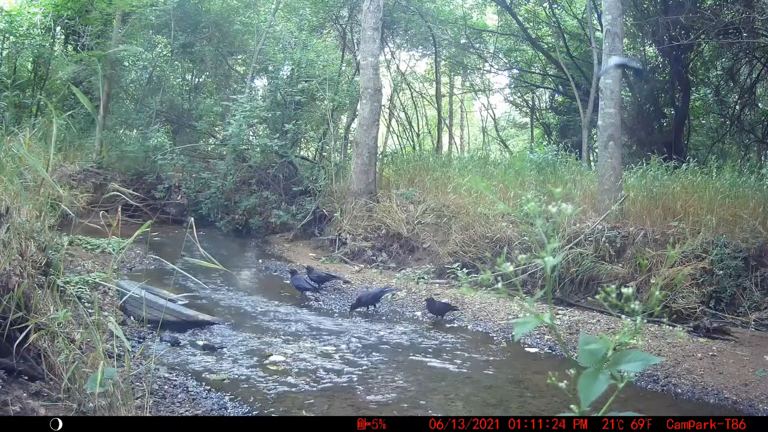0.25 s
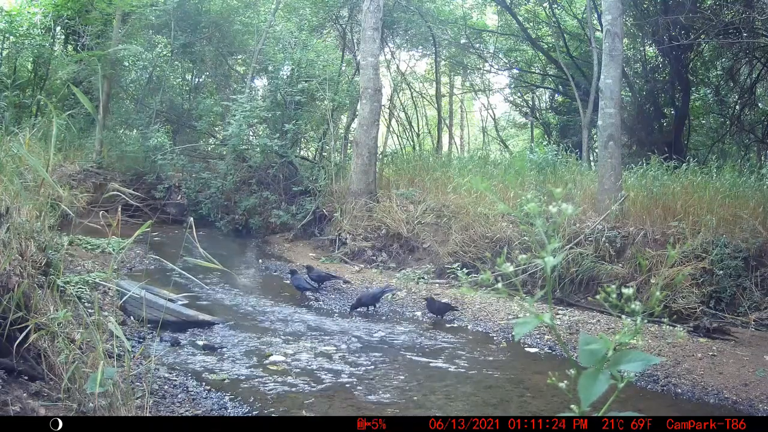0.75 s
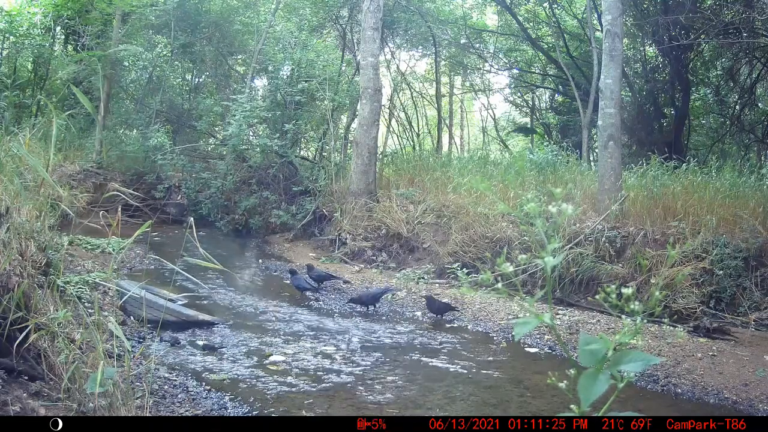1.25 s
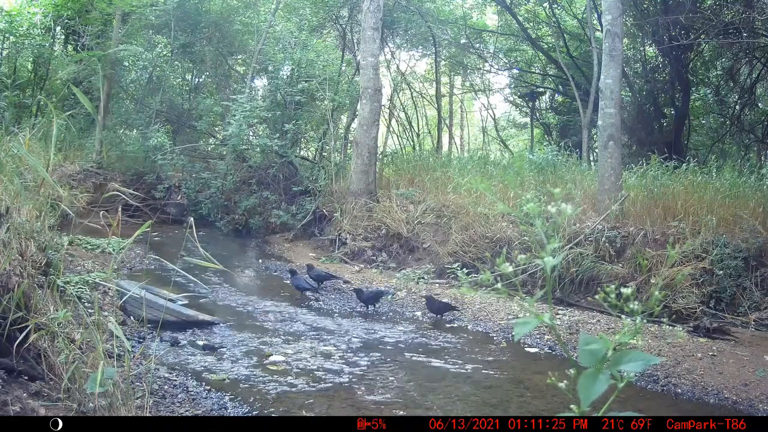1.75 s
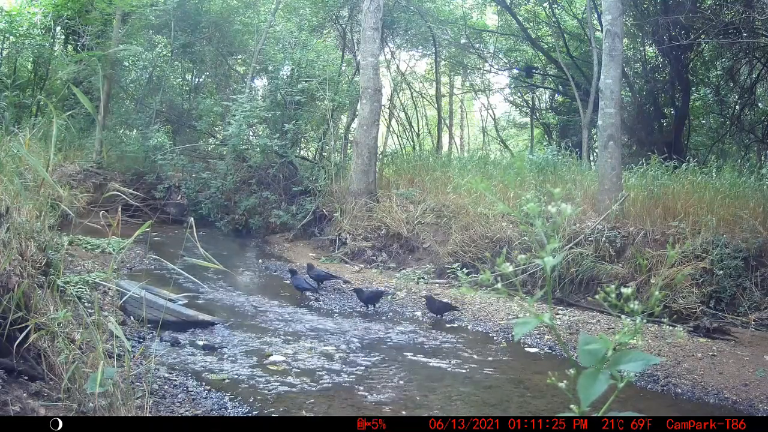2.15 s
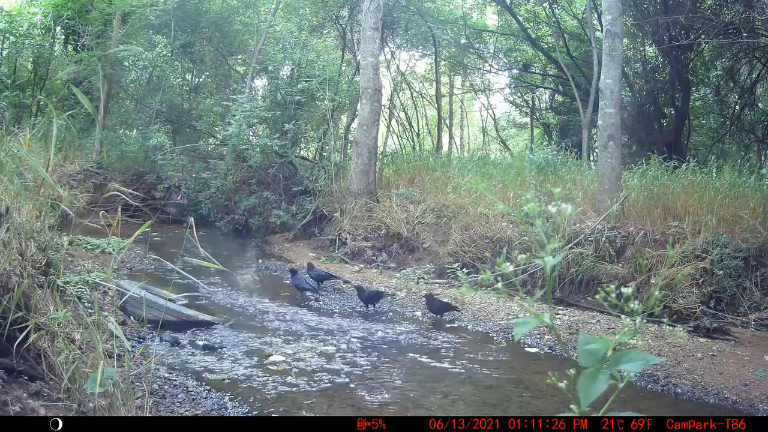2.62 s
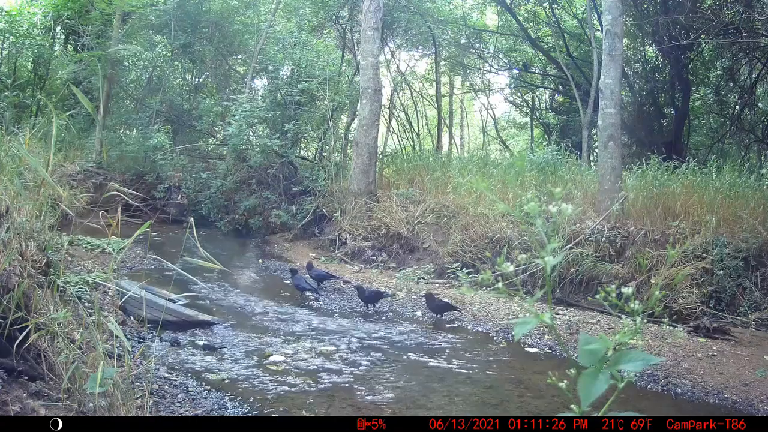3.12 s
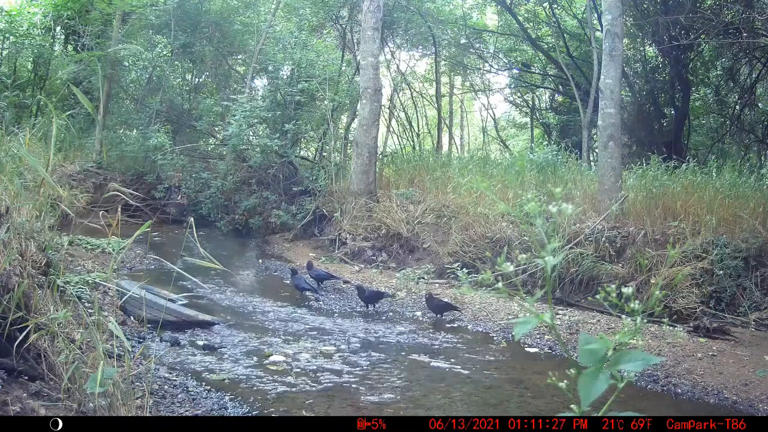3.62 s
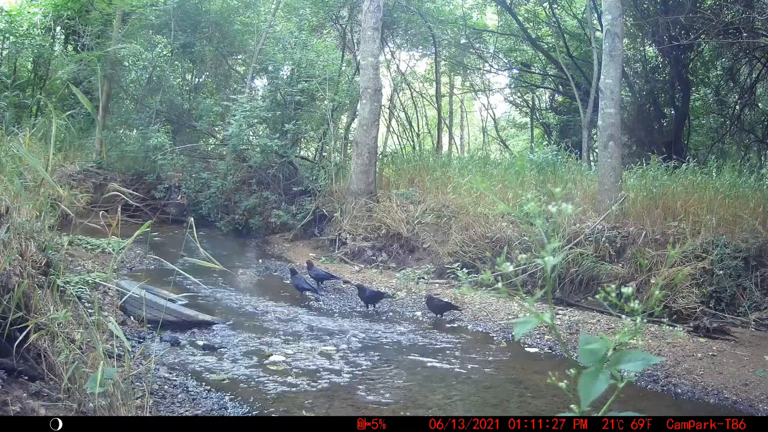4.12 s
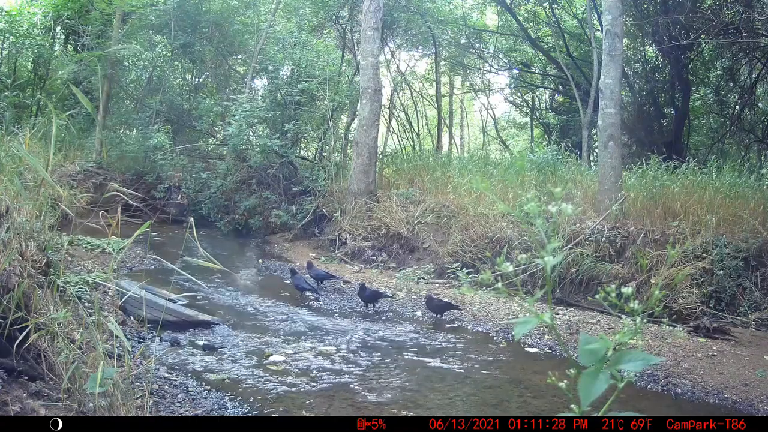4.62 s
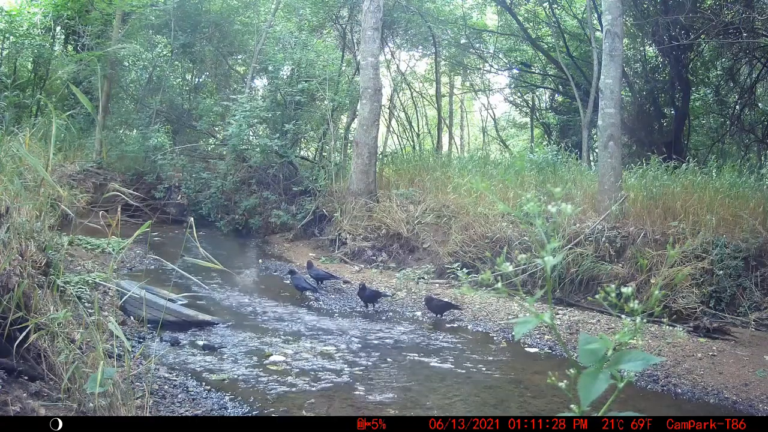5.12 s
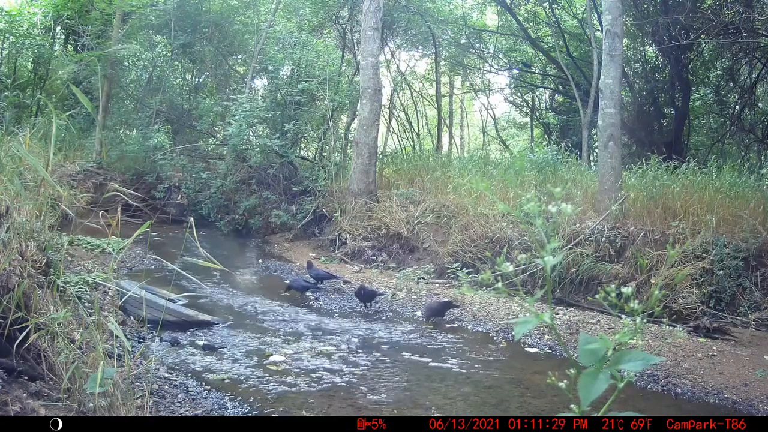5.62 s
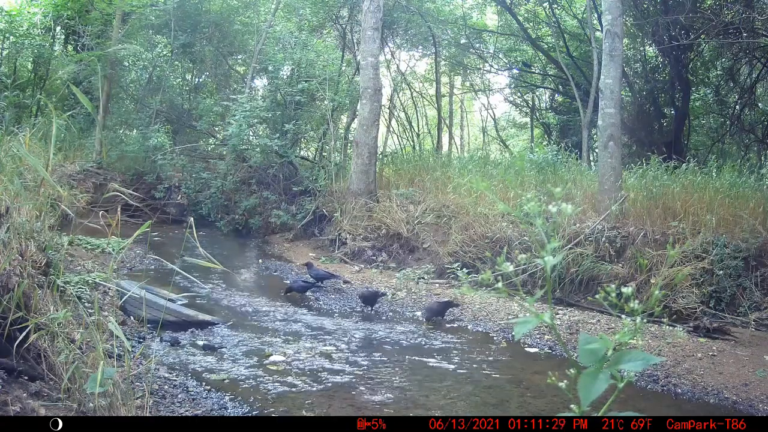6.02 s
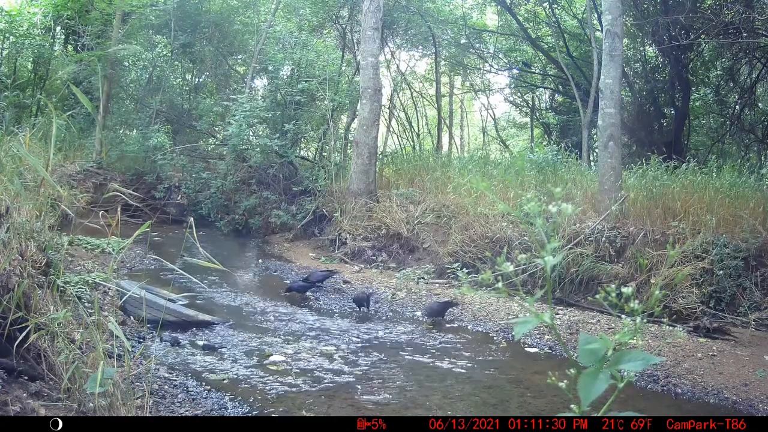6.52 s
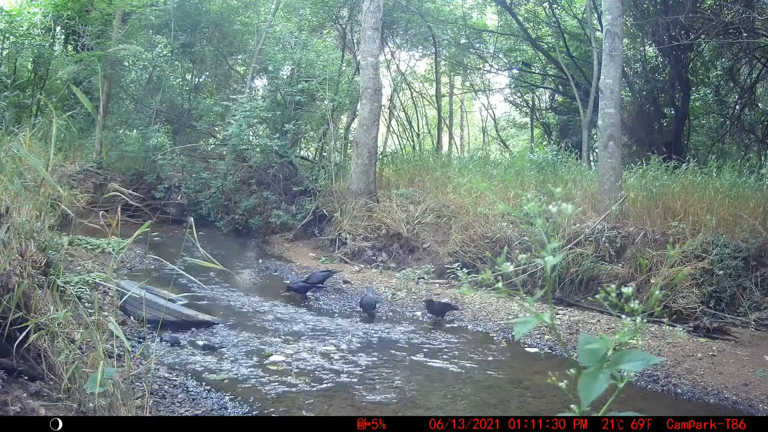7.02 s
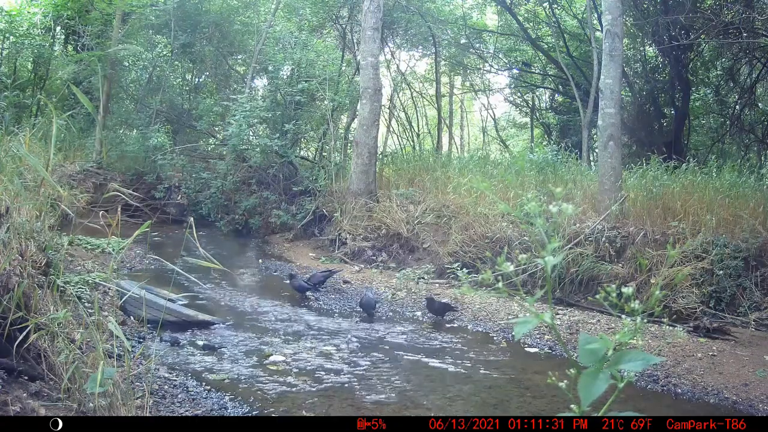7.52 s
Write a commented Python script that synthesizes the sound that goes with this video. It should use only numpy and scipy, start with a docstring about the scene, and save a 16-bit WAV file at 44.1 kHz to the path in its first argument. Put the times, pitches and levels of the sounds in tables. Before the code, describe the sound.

From 0 to 2.7 s the scene is quiet: a steady, dull rumble of distant traffic, a very faint hiss of creek water, slight leaf rustling in the first half second, and small high drips near 0.15, 0.4, 1.0, 1.5 and 2.5 s. A tiny pebble tick comes at 2.6 s. At 2.73 s a crow begins cawing, far louder than everything else: nine harsh, nasal caws of about 0.13-0.16 s at roughly 2.7, 3.1, 3.5, 3.8, 4.1, 4.4, 4.8, 5.2 and 5.7 s. Each arches quickly up and down in pitch, raspy at its edges, with a short scattered echo from the trees. The later caws are slightly lower and wider spaced. A low engine drone enters around 4.4 s, swelling near 5.8 s. From 6 to 7.75 s only rumble, drone, faint water, a few dry beak clicks and drips remain, including a lower plop near 7.6 s.

```python
"""Crow calling at a woodland creek

A crow on the gravel gives nine short caws: pulses and turbulence filtered by throat resonances.
Trunks and banks scatter each caw into a tail of decaying noise. Shaped noise makes the creek's wash and
the far traffic's rumble; a gliding sine makes a low engine drone that swells late on.
Ringing bubbles drip, leaves rustle in puffs of noise and a beak ticks on pebbles as resonant clicks."""
import sys
import numpy as np
from scipy import signal
from scipy.fft import rfft, irfft, next_fast_len
from scipy.io import wavfile
from scipy.ndimage import uniform_filter1d

SR = 44100
rng = np.random.default_rng(int(sys.argv[2]) if len(sys.argv) > 2 else 0)


def int16_out(signal):
    """Quantize to a 16-bit WAV file."""
    q = np.round(np.clip(np.atleast_2d(signal).T, -1, 1) * 32767)
    wavfile.write(sys.argv[1], SR, q.astype(np.int16))


N = 341907

# Traffic rumble. Each row: time in seconds, level in dB.
RUMBLE_LEVEL = [(0, -48), (2.6, -50.5), (3.4, -45.5), (5.9, -46.5), (6.5, -48), (7.75, -48)]
# Rumble spectrum. Each row: frequency in Hz, relative density in dB per Hz.
RUMBLE_SPECTRUM = [(11, -39.5), (18, -9), (55, 1.5), (133, -4.5), (189, -3), (348, -10.5), (485, -15.5),
                   (770, -18.5), (893, -17), (1290, -22), (1500, -25), (1950, -33.5), (3300, -120)]
# Creek hiss. Each row: time in seconds, level in dB.
CREEK_LEVEL = [(0, -62.5), (.6, -65), (7.75, -64.5)]
# Creek spectrum. Each row: frequency in Hz, relative density in dB per Hz.
CREEK_SPECTRUM = [(880, -31.5), (1500, 0), (2390, -2.5), (2750, -4), (3560, -6.5), (7390, -7.5),
                  (14500, -17)]
# Leaf rustles. Each row: centre in seconds, rms level at the centre in dB, 1/e half-length in seconds.
LEAF_RUSTLES = [(0.07, -62.5, 0.048), (0.245, -63.5, 0.076), (0.424, -65.5, 0.042)]
# Drips. Each row: start in seconds, level before onset and decay in dB, starting pitch in Hz.
DRIP_BUBBLES = [(0.1491, -52, 2210), (0.378, -54, 2900), (0.987, -52, 2510), (1.465, -46.5, 2587),
                (2.534, -50, 2384), (4.3693, -47, 2570), (6.0225, -53.5, 2697), (6.3929, -55.5, 3600),
                (6.778, -50.5, 2364), (7.0167, -55.5, 3600), (7.637, -45.5, 1368)]
# Beak ticks on pebbles. Each row: time in seconds, nominal peak in dB.
PEBBLE_TICKS = [(2.6091, -49), (6.1747, -43.5), (6.3531, -46), (6.4944, -45.5), (6.7035, -50)]
# Caws. Each row: start in seconds, length in seconds, time from start to top pitch in seconds,
# top pitch in Hz, level at peak effort in dB.
CAW_ROWS = [(2.733, .16, 0.0681, 654.8, -26.5), (3.127, 0.1462, 0.0622, 686, -26.5),
            (3.457, 0.1329, 0.0556, 690, -27.5), (3.782, 0.1346, 0.04954, 690.8, -28),
            (4.085, 0.1355, 0.0523, 692.1, -26.5), (4.446, 0.1302, 0.0527, 653.9, -26.5),
            (4.784, 0.1331, .052, 654.3, -27.5), (5.18, 0.1292, 0.0492, 639.2, -28.5),
            (5.681, 0.1293, 0.05465, 625.6, -27.5)]
# Windpipe and beak resonances. Each row: centre in Hz, width in Hz before widening, relative level in dB.
THROAT_MODES = [(1415, 364.3, -0.5), (1573, 608, -4), (2488.6, 614, -15), (3567, 1455, -14), (5296, 686, 1),
                (5829, 456, -1), (8400, 1248, -12.5), (10297, 2330, -20.5)]
# Weak low chest resonances. Each row: centre in Hz, width in Hz before widening, relative level in dB.
CHEST_MODES = [(743, 442, -20), (855.4, 241, -11.5)]
# Scatter of the wood. Each row: frequency in Hz, 60 dB decay in seconds before the reach limit,
# relative level in dB.
WOOD_DECAY = [(960, 0.887, 2), (1537, 0.379, -8), (3320, 0.609, -1), (6160, 0.3477, -1), (11370, 0.555, 1)]
# Engine drone. Each row: time in seconds, pitch in Hz, level in dB.
ENGINE_DRONE = [(4.4, 61, -52), (5.7, 65, -50), (5.85, 65.2, -46), (7.0, 67.9, -51.5), (7.75, 69.4, -49)]

RUMBLE_FLUTTER_DB, CREEK_FLUTTER_DB = .5, .4   # rms
WASH_SIDE_DB = -44.5   # side gain of rumble and creek
TICK_HZ, TICK_WIDTH_HZ = 5650, 1360   # width of each of two passes
# pitch arch: fall in s; shares of the top pitch missing at the start and after a full fall; roundness
FALL_S, ARCH_RISE, ARCH_SAG, ARCH_BEND = .075, .27, .34, 1.6
# effort: share of the length to its peak; dB under the peak at the start and at the end
EFFORT_TOP, SWELL_DB, FADE_DB = 0.5, 11.5, 2.5
ATTACK_S, RELEASE_S = .028, 0.02746
# rms share of the pitch; rms flutter in dB per order up to the fifth; loss in dB per order over the third
JITTER, SHIMMER_DB, ORDER_FALL_DB = .022, 1.5, 4.2
# turbulence in dB; its rise in dB per unit share of pitch sag; treble lean 0-1
RASP_DB, SLACK_DB, RASP_TILT = 2.5, 30, .45
BRIGHTENING = .35   # dB on the upper resonances per dB of effort
MODE_WIDENING = 1.615   # factor on the throat and chest widths
BEAK_CUT_HZ, BEAK_TOP_HZ = 1438.7, 10266   # the beak radiates little outside these
# a windpipe resonance climbs through each caw; the width is that of each of two passes
GLIDE_FROM_HZ, GLIDE_TO_HZ, GLIDE_WIDTH_HZ, GLIDE_DB = 3287, 3850, 529, -1.5
WOOD_DB, WOOD_SIDE_DB, DIRECT_DB = 0, -32, 0.5   # tail gain, its extra side gain, direct caw gain
WOOD_ONSET_S, WOOD_REACH_S = 0.00668, 0.2507   # build-up; the far trees return ever less
CUTOFF_HZ = 15800


def from_db(db):
    """The decibel law: 20 dB is a tenfold amplitude gain."""
    return 10 ** (np.asarray(db) / 20)


def rms_one(x):
    """Energy normalisation: scale to unit rms."""
    return x / np.sqrt(np.mean(x ** 2) + 1e-20)


def in_time(rows, t):
    """Linear interpolation: the columns of a curve table read at times t."""
    s, *columns = np.transpose(rows)
    return [np.interp(t, s, c) for c in columns]


def at_hz(points, hz):
    """Logarithmic frequency: a spectrum table interpolated on a log axis."""
    points = np.array(points)
    return np.interp(np.log(hz + 1), np.log(points[:, 0]), points[:, 1])


def drift(size, rate_hz):
    """Low-passed noise: a double pole leaves slow chance of unit rms."""
    r = np.exp(-2 * np.pi * rate_hz / SR)
    settle = 9000   # samples dropped while the filter settles
    slow = signal.lfilter([1], [1, -2 * r, r * r], rng.standard_normal(size + settle))
    return rms_one(slow[settle:])


def coloured(spectrum):
    """Spectral shaping: two independent noises (mid, side) weighted by frequency; joint rms 1."""
    size = next_fast_len(N)
    gain = from_db(at_hz(spectrum, np.arange(size // 2 + 1) * SR / size))
    white = rng.standard_normal((2, size))
    return rms_one(irfft(rfft(white) * gain, size)[:, :N])


def peak_filter(hz, width):
    """Damped resonator: numerator and denominator of a two-pole peak of gain 1."""
    r = np.exp(-np.pi * width / SR)
    return [(1 - r * r) / 2, 0, (r * r - 1) / 2], [1, -2 * r * np.cos(2 * np.pi * hz / SR), r * r]


def resonance(x, hz, width):
    """Resonance: a signal passed through one fixed damped resonator."""
    return signal.lfilter(*peak_filter(hz, width), x)


def rumble(t):
    """Broadband noise: far traffic as low noise whose level wanders slowly; mid and side."""
    level_db = in_time(RUMBLE_LEVEL, t)[0] + RUMBLE_FLUTTER_DB * drift(N, 0.9)
    return coloured(RUMBLE_SPECTRUM) * from_db(level_db) * from_db([[0], [WASH_SIDE_DB]])


def creek(t):
    """Broadband noise: the wash of water as fluttering hiss; mid and side."""
    level_db = in_time(CREEK_LEVEL, t)[0] + CREEK_FLUTTER_DB * drift(N, 12)
    return coloured(CREEK_SPECTRUM) * from_db(level_db) * from_db([[0], [WASH_SIDE_DB]])


def rustles(t):
    """Friction noise: leaves as soft Gaussian puffs of grainy treble noise."""
    puffs = sum(from_db(db) * np.exp(-((t - s) / length) ** 2) for s, db, length in LEAF_RUSTLES)
    band = signal.butter(1, [2000, 10000], "band", fs=SR, output="sos")
    noise = rms_one(signal.sosfilt(band, rng.standard_normal(N)))
    grain = from_db(2.6 * drift(N, 60))
    return puffs * noise * grain


def drips():
    """Bubble resonance: each drip rings for some tens of cycles, rising a little in pitch."""
    out, t = np.zeros(N), np.arange(2000) / SR
    for s, peak_db, hz in DRIP_BUBBLES:
        cycles = hz * t
        ring = np.sin(2 * np.pi * cycles * (1 + 4.5 * t))
        decay = from_db(peak_db - 1.035 * cycles)   # a fixed loss per cycle
        onset = np.minimum(cycles / 1.3, 1)
        start = round(s * SR)
        out[start:start + len(t)] += ring * decay * onset
    return out


def ticks():
    """Impulse response: single clicks through a wide, bright resonance, passed twice."""
    clicks = np.full(N, 1e-18)   # a tiny floor in place of exact zeros
    for s, peak_db in PEBBLE_TICKS:
        clicks[round(s * SR)] = from_db(peak_db) * SR / (np.pi * TICK_WIDTH_HZ)
    return resonance(resonance(clicks, TICK_HZ, TICK_WIDTH_HZ), TICK_HZ, TICK_WIDTH_HZ)


def crow():
    """Superposition: all caws added on one dry track."""
    out = np.zeros(N)
    for row in CAW_ROWS:
        start, sound = caw(*row)
        out[start:start + len(sound)] += sound
    return out


def caw(start, length, top_s, top_hz, peak_db):
    """Source and filter: unsteady syrinx pulses and turbulence excite the throat."""
    t = np.arange(0, length, 1 / SR)
    up = np.clip(1 - t / top_s, 0, 1)
    down = np.clip((t - top_s) / FALL_S, 0, 1)
    pitch = top_hz * (1 - ARCH_RISE * up ** ARCH_BEND - ARCH_SAG * down ** ARCH_BEND)
    effort_db = np.interp(t / length, [0, EFFORT_TOP, 1], [-SWELL_DB, 0, -FADE_DB])
    phase = 2 * np.pi * np.cumsum(pitch * (1 + JITTER * drift(len(t), 154))) / SR
    slack = 1 - pitch / top_hz   # slack membranes leak more air: hoarse start and end
    rasp_gain = from_db(RASP_DB + SLACK_DB * slack)
    source = rms_one(syrinx_pulses(phase)) + rasp_gain * rms_one(turbulence(phase))
    voice = throat(source, from_db(BRIGHTENING * effort_db))
    voice /= np.sqrt(uniform_filter1d(voice ** 2, size=900) + 1e-9)   # effort alone sets the loudness
    edges = np.clip(t / ATTACK_S, 0, 1) * np.clip((length - t) / RELEASE_S, 0, 1)
    return round(start * SR), voice * from_db(peak_db + effort_db) * edges


def syrinx_pulses(phase):
    """Harmonic series: eleven orders, each with its own flutter, make broken overtones."""
    pulses = np.zeros(len(phase))
    for k in range(1, 12):
        shimmer_db = SHIMMER_DB * min(k, 5) * drift(len(phase), 90)
        pulses += np.cos(k * phase) * from_db(shimmer_db - ORDER_FALL_DB * max(k - 3, 0))
    return pulses


def turbulence(phase):
    """Modulated jet noise: treble-leaning breath that bursts once a cycle."""
    noise = signal.lfilter([1, -RASP_TILT], [1], rng.standard_normal(len(phase)))
    return noise * (1 + 0.75 * np.cos(phase))


def throat(x, bright):
    """Parallel resonators: chest, windpipe and beak; those over the second open with effort."""
    first, second, *upper = modes(x, THROAT_MODES)
    upper.append(from_db(GLIDE_DB) * gliding(gliding(x)))
    beak_band = signal.butter(5, [BEAK_CUT_HZ, BEAK_TOP_HZ], "band", fs=SR, output="sos")
    beak = signal.sosfilt(beak_band, first + second + bright * sum(upper))
    return beak + sum(modes(x, CHEST_MODES))


def modes(x, table):
    """Cascaded resonance: each mode is applied twice so the valleys stay dark."""
    out = []
    for hz, width, db in table:
        wide = MODE_WIDENING * width
        out.append(from_db(db) * resonance(resonance(x, hz, wide), hz, wide))
    return out


def gliding(x, size=128):
    """Time-varying resonance: a peak of gain 1 whose centre climbs block by block."""
    state, out = np.zeros(2), []
    for i in range(0, len(x), size):
        hz = GLIDE_FROM_HZ + (GLIDE_TO_HZ - GLIDE_FROM_HZ) * i / len(x)
        block, state = signal.lfilter(*peak_filter(hz, GLIDE_WIDTH_HZ), x[i:i + size], zi=state)
        out.append(block)
    return np.concatenate(out)


def wood(x):
    """Diffuse scattering: trunks and banks return noise that builds briefly and dies band by band."""
    # lows pass round trunks
    x = signal.sosfilt(signal.butter(6, 820, "high", fs=SR, output="sos"), x)
    t = np.arange(SR) / SR
    table = np.array(WOOD_DECAY)
    tail = np.zeros((2, SR))   # mid and side
    edges = 300 * 2 ** np.arange(0, 6, .75)   # Hz
    for low, high in zip(edges, edges[1:]):
        band_filter = signal.butter(2, [low, high], "band", fs=SR, output="sos")
        band = signal.sosfilt(band_filter, rng.standard_normal((2, SR)))
        centre = np.sqrt(low * high)
        t60 = at_hz(table[:, [0, 1]], centre)
        level_db = at_hz(table[:, [0, 2]], centre)
        tail += band * from_db(level_db - 60 * t / t60)
    tail *= (1 - np.exp(-t / WOOD_ONSET_S)) * np.exp(-(t / WOOD_REACH_S) ** 2)
    tail /= np.sqrt(np.sum(tail[0] ** 2))   # unit energy in the mid
    tail[1] = signal.lfilter([1, -.7], [1], tail[1])   # first difference: the side leans to the treble
    scattered = signal.fftconvolve(x[None], tail, axes=1)[:, :N]
    return scattered * from_db([[WOOD_DB], [WOOD_DB + WOOD_SIDE_DB]])


def drone(t):
    """Phase accumulation: the engine as one sine of gliding pitch and wavering level."""
    hz, level_db = in_time(ENGINE_DRONE, t)
    swell = np.clip((t - ENGINE_DRONE[0][0]) / .5, 0, 1)
    tone = np.sqrt(2) * np.sin(2 * np.pi * np.cumsum(hz) / SR)   # unit rms
    return tone * from_db(level_db + 1.0 * drift(N, 1.54)) * swell


def scene():
    """Mid-side stereo: the layers summed, then decoded to left and right."""
    t = np.arange(N) / SR
    bird = crow()
    direct = from_db(DIRECT_DB) * bird * [[1], [-.025]]   # the crow sits slightly right
    central = (rustles(t) + drips() + ticks() + drone(t)) * [[1], [0]]
    mid, side = rumble(t) + creek(t) + central + direct + wood(bird)
    return np.array([mid + side, mid - side])


def record(dry):
    """Low-pass filtering: a steep slope cuts the top, 60 dB down from the cutoff upwards."""
    return signal.sosfilt(signal.cheby2(14, 60, CUTOFF_HZ, fs=SR, output="sos"), dry)


dry = scene()
out = record(dry)
int16_out(out)
```